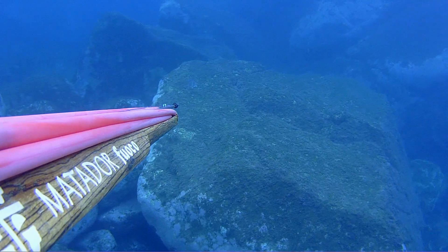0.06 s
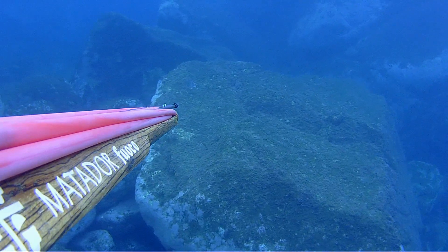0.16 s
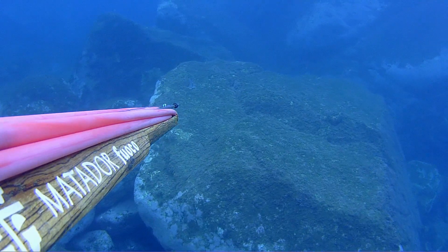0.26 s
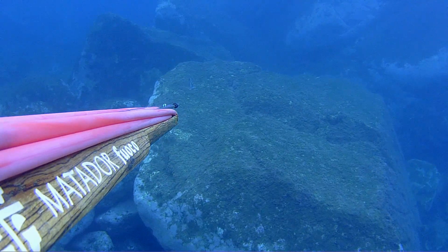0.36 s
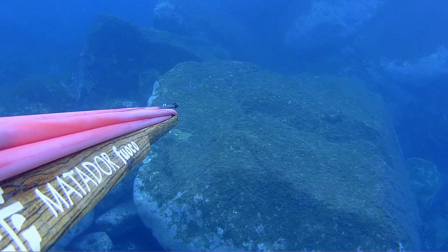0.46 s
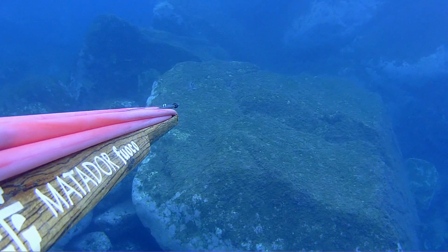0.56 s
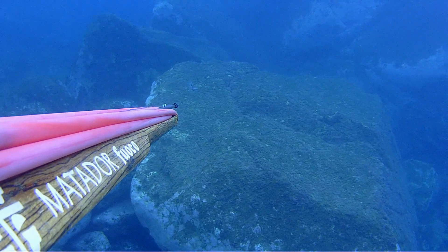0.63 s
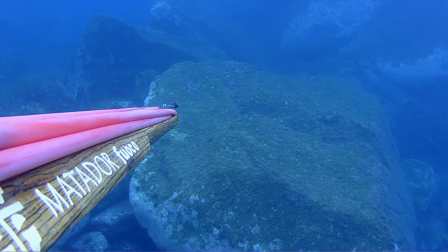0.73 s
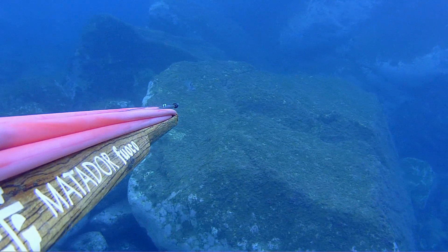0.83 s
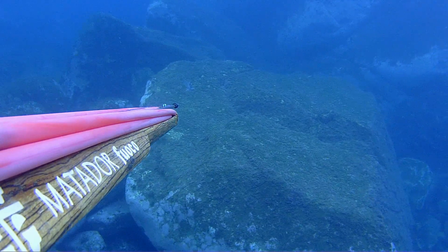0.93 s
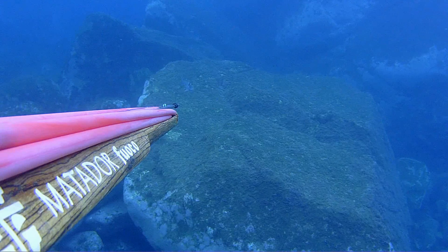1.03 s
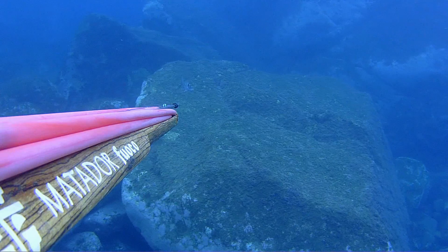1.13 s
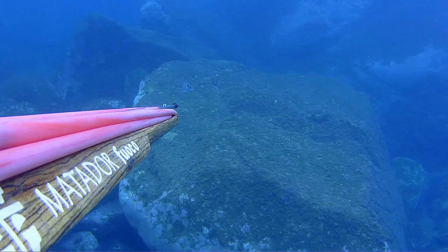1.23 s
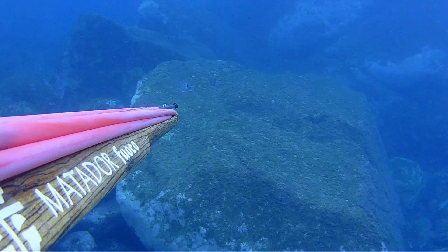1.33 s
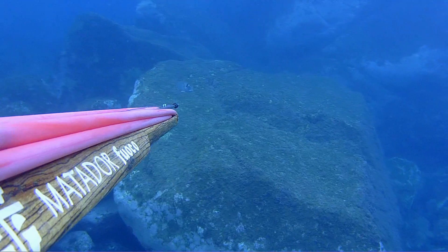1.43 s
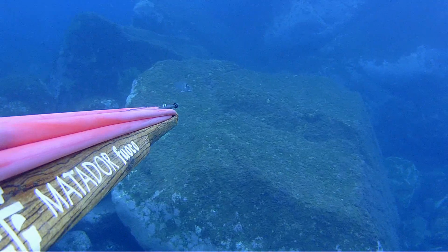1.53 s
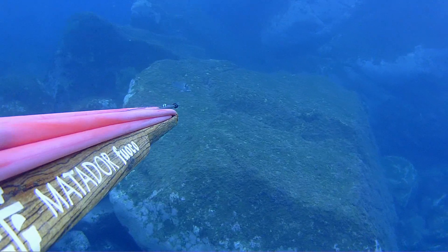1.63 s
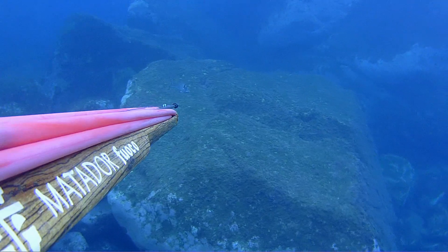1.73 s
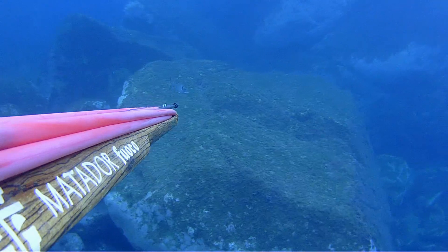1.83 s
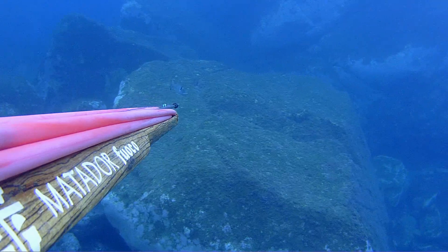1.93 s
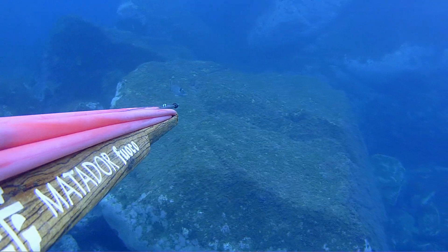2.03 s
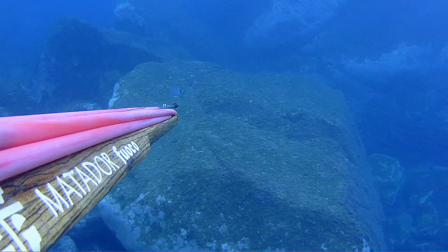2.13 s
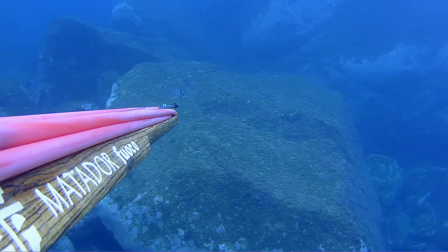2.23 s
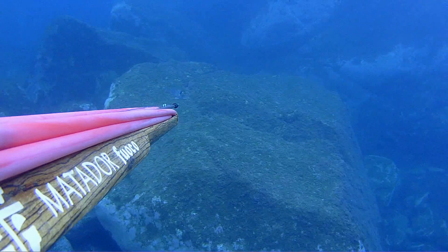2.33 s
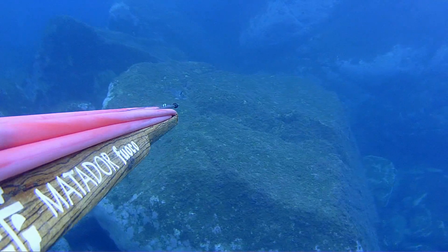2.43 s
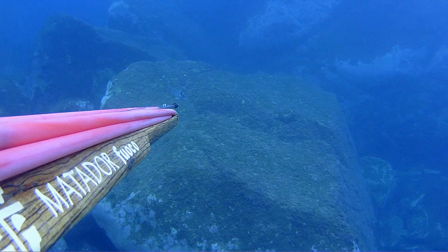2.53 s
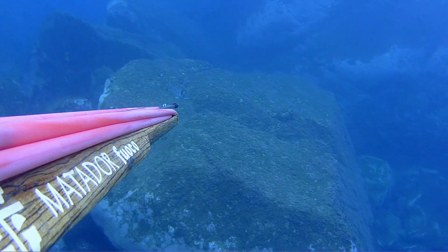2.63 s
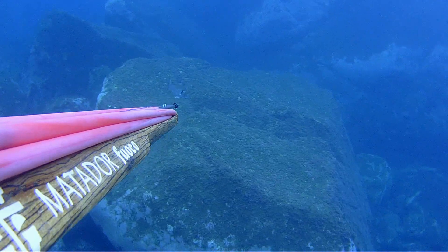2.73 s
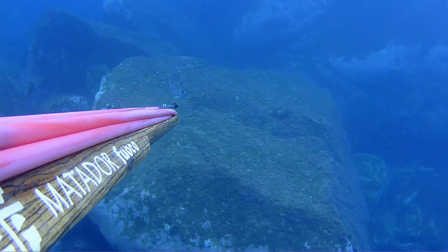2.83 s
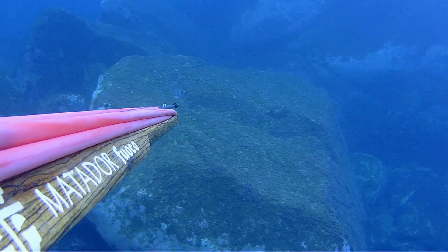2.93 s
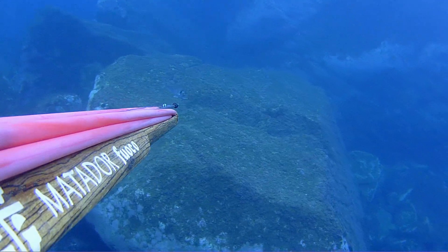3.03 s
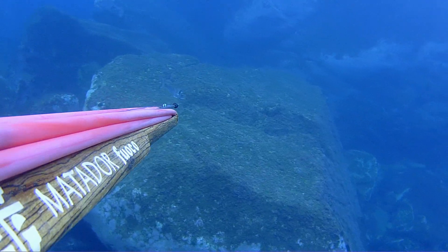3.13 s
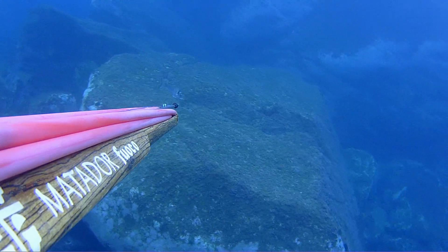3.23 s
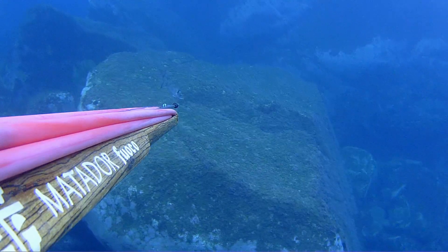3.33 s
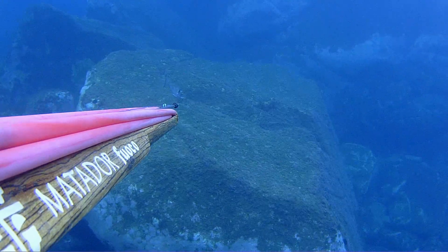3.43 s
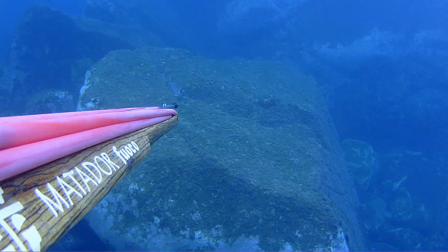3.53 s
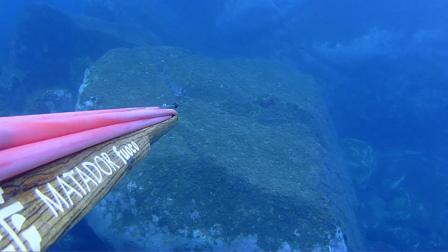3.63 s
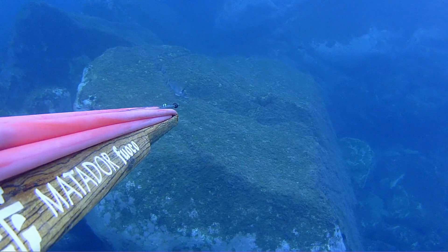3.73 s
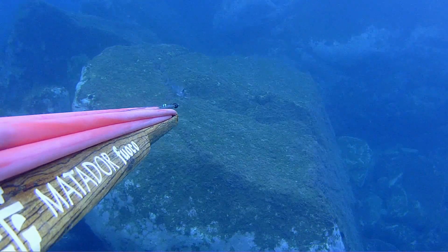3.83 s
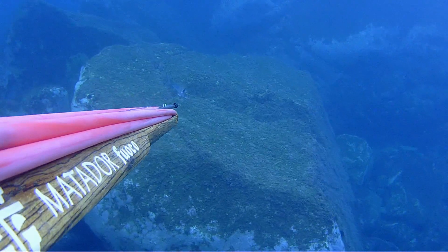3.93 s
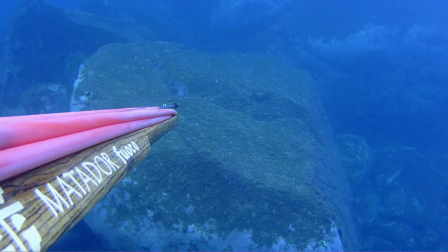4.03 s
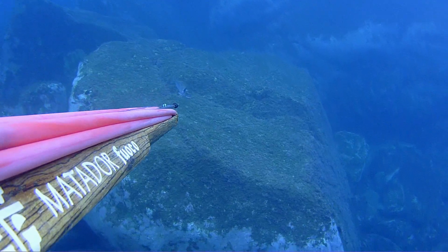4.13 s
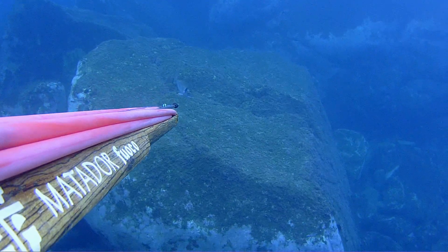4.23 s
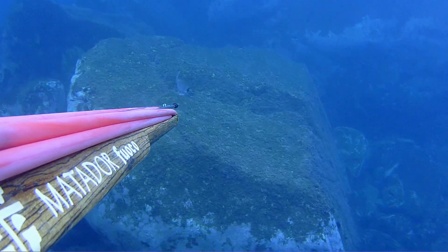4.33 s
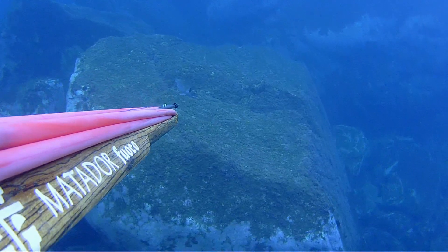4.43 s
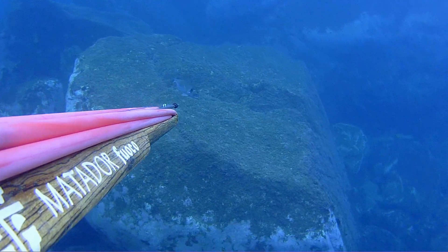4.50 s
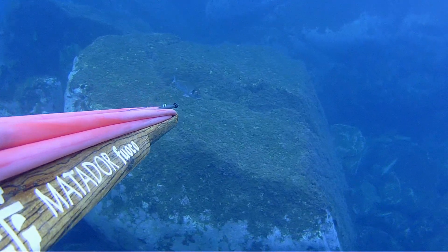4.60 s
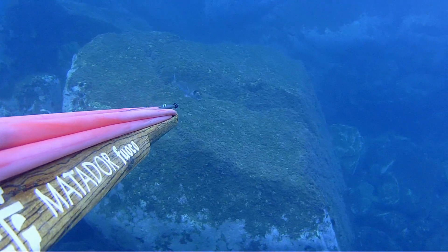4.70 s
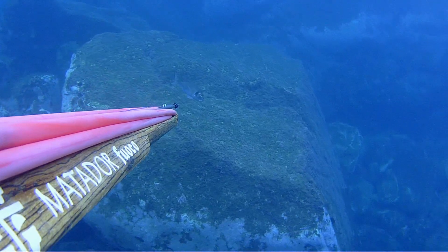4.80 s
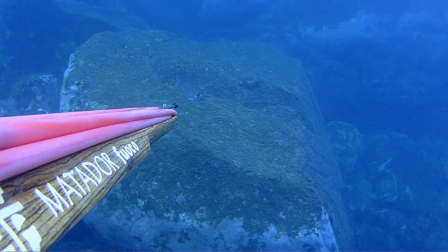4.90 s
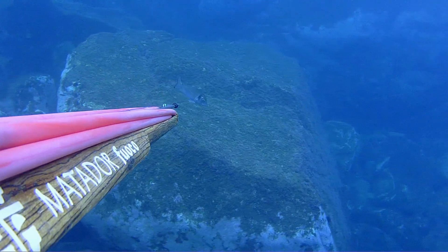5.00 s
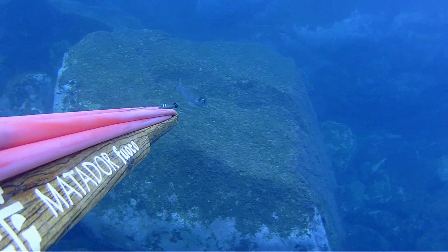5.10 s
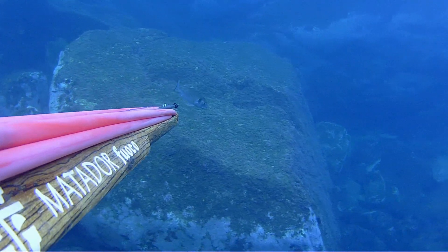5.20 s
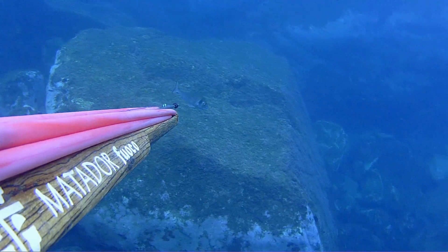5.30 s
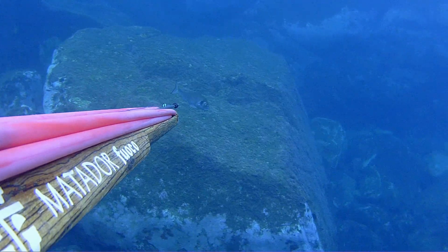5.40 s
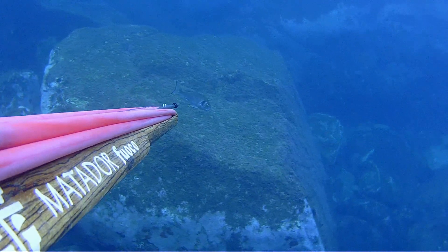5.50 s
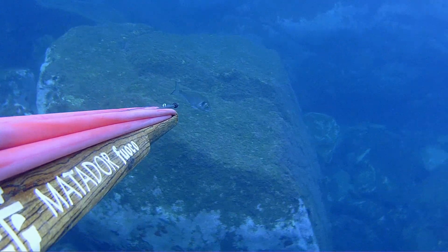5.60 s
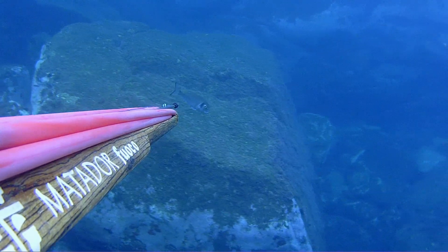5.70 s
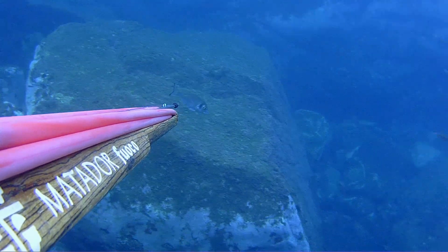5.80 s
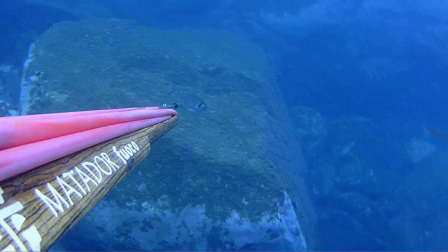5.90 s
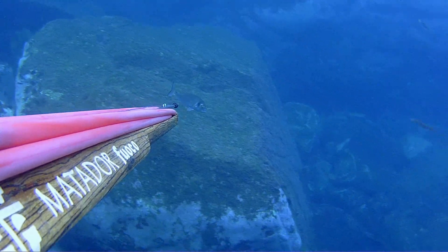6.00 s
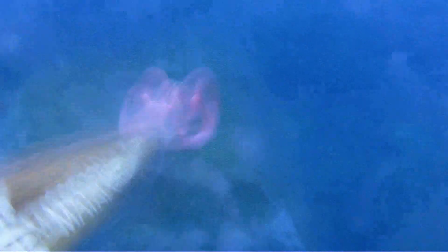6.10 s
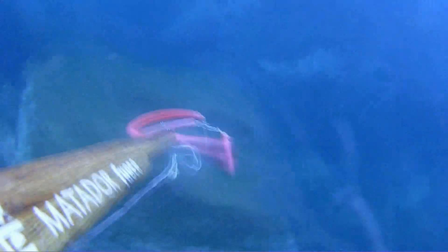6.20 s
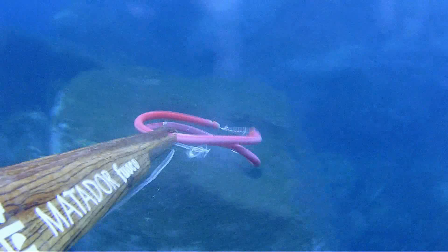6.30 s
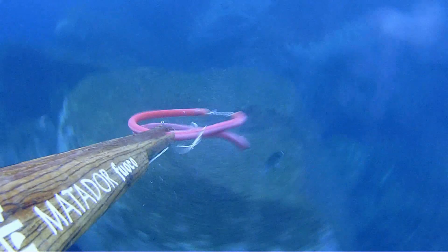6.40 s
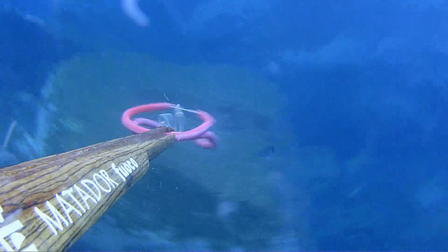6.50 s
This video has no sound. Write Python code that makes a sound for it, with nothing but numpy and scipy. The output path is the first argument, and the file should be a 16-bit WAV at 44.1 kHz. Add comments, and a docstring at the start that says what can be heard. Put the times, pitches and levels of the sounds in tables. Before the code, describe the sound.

Inside a sealed underwater housing on a band-powered speargun, a low hiss continues with sparse dry snaps and a faint low shudder from the hands, which grows. At about six seconds the gun fires: a huge distorting thump and clattering rattle of the wooden stock, quickly damped, then a short gritty ring of steel on rock and a few hard, woody knocks.

```python
"""Hiss, distant snaps and the low shudder of the hands come first, heard under water from a sealed
camera housing on a band-powered speargun. The trigger lets go: swings and slow modes jolt the
microphone into overload while filtered noise rattles the wooden stock. A steel shaft rings on
rock as wavering sines over grit, and loose parts knock on the stock with short dying modes."""
import sys
import numpy as np
from scipy import signal
from scipy.fft import rfft, irfft
from scipy.io import wavfile
from scipy.ndimage import uniform_filter1d

SR = 44100
rng = np.random.default_rng(int(sys.argv[2]) if len(sys.argv) > 2 else 0)


def transcribe(signal):
    """Save signal, clipped to [-1, 1], as a 16-bit WAV file at the path in sys.argv[1]."""
    frames = np.atleast_2d(signal).T
    limited = np.clip(frames, -1, 1)
    pcm = np.round(limited * 32767).astype(np.int16)
    wavfile.write(sys.argv[1], SR, pcm)


N = 288855

# Colour of the microphone and water hiss: pitch_hz, level_db (per Hz, relative)
HISS_COLOUR = [(29, -26), (50, -13), (60, -1.5), (380, -4), (440, -6), (690, -9), (2750, -21.5),
               (12000, -26), (12800, -26), (13000, -70)]
HISS_DB = -55

# Unsteady hands on the grip, tightening toward the shot: start_s, level_db
GRIP_LEVELS = [(0.0, -65), (0.75, -63.5), (1.45, -61), (2.0, -60.5), (2.65, -59.5), (3.05, -55),
               (3.4, -52.5), (3.54, -59), (3.62, -48.5), (3.97, -52.5), (4.08, -64), (4.3, -55),
               (4.45, -59.5), (5.05, -54.5), (5.28, -52), (5.55, -47), (5.76, -48.5), (5.99, -42)]
# Colour of the shudder, then the cut that keeps it low: pitch_hz, level_db
SHUDDER_COLOUR = [(4, 4), (12, 12.5), (35, 11), (50, -2.5), (62, -44)]
SHUDDER_CUT = [(60, 0), (80, -40)]
TREMOR_DB = 1.8  # the shudder comes and goes a few times a second
# The gun settles in the water, rocking while the stock hums:
# start_s, rock_level_db, rock_pitch_hz, hum_level_db, hum_pitch_hz
SETTLING = [(6.19, -26, 28.6, -34, 94.4), (6.208, -39, 28.8, -41, 92), (6.244, -22.5, 28.5, -38, 96),
            (6.29, -27.5, 28.3, -45, 95), (6.332, -36, 28.1, -47, 93.5), (6.416, -38, 28.3, -39, 95.8),
            (6.448, -37.5, 28.3, -52.5, 95), (6.476, -37, 29.1, -41, 104), (6.508, -44, 28.8, -42, 106),
            (6.55, -48, 30.6, -42, 119)]
# Colour of the water slopping round the gun: pitch_hz, level_db
SLOP_COLOUR = [(5, -20), (13, 5.5), (45, -4), (70, -16), (160, -16.5), (260, -40), (500, -110)]

# The nearer snaps: start_s, level_db (before shares and shell), brightness_db_per_octave,
# high_shell_extra_db
NEAR_SNAPS = [(0.028, -44.5, -1.5, -2), (0.195, -55.5, -2, 2), (0.614, -54, 0, 5), (0.6355, -50.5, 1, 6),
              (0.6494, -54, 0, 1), (0.9353, -58, 10, 1), (0.9472, -55, 8, 9), (1.055, -51, -7.5, 7),
              (1.2306, -55.5, 2, 9), (1.2464, -54, 0, 0), (1.6506, -56, 0, 10.5), (1.7419, -52.5, 0, 10.5),
              (2.0103, -54, 3, 5), (2.0264, -53, 3, -6), (2.0394, -59.5, -9, 0), (2.0642, -56, -1, 2),
              (2.5691, -57, 11, 0), (2.596, -44, 0, -3), (2.6844, -58, 0, 8), (2.7811, -56.5, -7, 8),
              (2.827, -59, 1, 6), (2.9382, -52, -3, -2), (2.9741, -47, -2, 3), (3.482, -55.5, 10, 6),
              (3.6391, -56, -2, -2), (3.697, -53, 0, -3), (3.894, -52.5, 5, 4), (4.0238, -56, 0, 1),
              (4.3864, -53.5, 11, 2), (4.3989, -36.5, -2.5, -5), (4.5151, -36.5, 1, -3.5),
              (4.7436, -51, 5.5, -5), (5.1392, -57.5, 6.5, 2), (5.2205, -54.5, 9, 1),
              (5.7214, -44, -2.5, -9), (5.8646, -56.5, 8, 0)]
# Share of a plain snap in the deep, low, high and top shell modes: centre_hz, level_db
SNAP_SHARES_BY_BAND = [(1600, -10.5), (3900, 0), (6700, -7), (10500, -4.5)]
# Resonances of the housing shell, deep to top: pitch_hz, width_hz, level_db (relative)
SHELL_DEEP_MODES = [(1220, 430, -3), (1530, 270, -2), (2270, 380, 3)]
SHELL_LOW_MODES = [(2856, 220, 1), (3490, 410, -1), (4380, 410, 2), (4820, 460, -1.5)]
SHELL_HIGH_MODES = [(6250, 680, -1), (7240, 560, 0)]
SHELL_TOP_MODES = [(8900, 1200, -3.5), (10700, 860, -1), (12000, 1200, -10)]
# Upper limit of the snaps: pitch_hz, level_db
SNAP_TOP_LIMIT = [(12600, 0), (13000, -8), (13300, -50)]
FAR_SNAPS_PER_S, FAR_SNAP_DB = 14, -66
FAR_DULLEST, FAR_BRIGHTEST = -2.5, 8  # dB per octave
FAR_HIGH_DB = 7  # at most this much extra in the high shell modes

# Knocks on the stock: start_s, level_db (peak of the low modes), treble_db (relative to them)
STOCK_KNOCKS = [(6.3496, -14.5, -10), (6.4966, -9.5, -9), (6.521, -9, -20), (6.5465, -11, 0.5)]
# Short modes of the wood, low and high: pitch_hz, level_db (relative), t60_s
KNOCK_LOW_MODES = [(700, -18, .02), (1150, -10, .011), (1500, 0, .015), (1870, -2, .012), (2200, -12, .01)]
KNOCK_HIGH_MODES = [(2700, -3, .012), (3270, -3, .012), (4650, -11, .028), (5000, -4, .01),
                    (5600, -4, .012), (6490, -9, .01)]
# Dull contact of the wood, colouring the low modes' drive: pitch_hz, level_db
WOOD_CONTACT = [(350, -30), (950, -8), (1400, 0), (2100, -2.5), (3600, -29), (12000, -50)]

# Steel modes of the shaft: pitch_hz, level_db (over the grit), t60_s (before the overall fade)
SHAFT_MODES = [(3284, -8, .3), (4040, -8, .3), (4091, -1, .5), (6142, -8, .9), (8193, -13, 9.),
               (9458, -10, .3), (10540, -13, .4), (12280, -13, 2.)]
# Colour of the grit: pitch_hz, level_db (per Hz, relative)
GRIT_COLOUR = [(600, -45), (1000, -14), (3700, -6.5), (5050, -10), (9400, -14.5), (13400, -16),
               (14000, -70)]
GRIT_FADE_T60 = 0.61  # seconds, before the overall fade
# The strike swells as the echoes arrive, holds, then dies
STRIKE_S, STRIKE_DB, STRIKE_FROM_DB = 6.343, -32.5, -19
STRIKE_RISE_S, STRIKE_HOLD_S, STRIKE_T60 = 0.016, 0.021, 0.18

# Bumps that set the stock rattling: start_s, level_db (before the stock), t60_s,
# bass_share_db, treble_share_db
BUMPS = [(6.0128, -36, .03, 0, -6), (6.0155, 3, .006, 5, -7), (6.0176, 0, .01, 2.5, 4.5),
         (6.0226, -2.5, 0.021, -5, -2), (6.0307, .5, 0.0085, 2.5, 1), (6.0418, -41.5, 0.038, 6.5, -11),
         (6.0532, -25, .03, 1, -8), (6.0559, 4, 0.04, -7.5, -4), (6.0646, -6, .077, 3.5, -9),
         (6.0753, -6.5, .029, 5.5, 0), (6.081, -10.5, 0.036, 8, -7), (6.0921, -1.5, 0.041, 3.5, -1.5),
         (6.0965, -10.5, .042, 7, 0), (6.1068, -9, 0.046, 12, -8), (6.110, -9.5, 0.098, 3.5, -5),
         (6.122, -15, .053, 1.5, -5.5), (6.1343, -18, .023, 8, -9), (6.152, -23, .15, -2.5, -1.5),
         (6.178, -15, .032, -17, 3.5), (6.181, -13, 0.022, 3.5, -21), (6.195, -28, .047, -4, -11),
         (6.217, -28.5, .049, -13, 0), (6.2225, -30.5, .01, -8, 6), (6.3076, -37.5, 0.063, 1, -10),
         (6.476, -55.5, 0.33, 15.5, -20), (6.503, -37, .056, -1, -7)]
TREBLE_FADE = 0.73  # the treble of a bump dies in this share of its t60
# Slack bands and line drag along the stock: start_s, level_db (before the stock)
DRAG_LEVELS = [(6.205, -63), (6.215, -44), (6.245, -36.5), (6.30, -45), (6.335, -42.5), (6.37, -41.5),
               (6.42, -60), (6.48, -58), (6.52, -49), (6.536, -36), (6.55, -41)]
DRAG_BASS_DB, DRAG_TREBLE_DB = -5.5, -12.5
# Resonances of the stock, bass, middle and treble: pitch_hz, width_hz, level_db (relative)
STOCK_BASS_MODES = [(205, 163, 0.5), (280, 205, 0), (390, 232, -1.5), (569, 300, -1.5)]
STOCK_MIDDLE_MODES = [(944, 480, -2.5), (1570, 380, 2.5), (2020, 840, -7)]
STOCK_TREBLE_MODES = [(3480, 1520, 3), (6600, 750, -2.5), (9600, 1600, -2.5), (13100, 1400, -18)]

# The released gun swings and is caught by the hand: start_s, level_db (before overload), pitch_hz
RELEASE_SWING = (6.0165, 5.8, 52.1)
SWING_CYCLES, CATCH_S = 1.25, .00055
# Recoil knocks the gun back and forth: start_s, level_db (before the push), push (signed factor)
RECOIL_KNOCKS = [(6.056, 5.5, -0.48), (6.072, -2, 0.74), (6.083, -3, -0.99), (6.0921, 4, 0.79),
                 (6.110, -5, -0.75), (6.1412, -10, 0.56), (6.164, -12, 0.28), (6.217, -24, -0.54)]
# Slow modes of the gun: pitch_hz, level_db (relative), t60_s
SWAY_MODES = [(33.2, -1.5, 0.27), (44.9, -8.5, 0.17), (97.5, -4.5, 0.24), (147.5, -8, 0.157),
              (188.3, -4.5, 0.11), (233.4, -6.5, 0.14), (276.7, -9, 0.146), (388.5, -9, 0.092),
              (508, -14, 0.086), (589, -14, 0.13)]

# A faint difference between the two channels, mostly treble: pitch_hz, level_db
CHANNEL_DIFFERENCE = [(500, -77), (1500, -59), (2500, -44), (6000, -27), (9000, -30), (13000, -44)]
FULL_SCALE = 0.46
EDGE_HZ = 15400  # top of the passed band


def gain_of(db):
    """Turns decibels into an amplitude factor."""
    return 10 ** (np.asarray(db) / 20)


def evened(x):
    """Brings a sound to unit RMS."""
    return x / np.sqrt(np.mean(x ** 2) + 1e-20)


def wander(noise, *widths):
    """Smooths noise over these spans of samples into a slow drift of unit RMS."""
    for width in widths:
        noise = uniform_filter1d(noise, size=width)
    return evened(noise)


def add(mix, start_s, sound):
    """Drops a sound into the mix, cut at the end."""
    part = mix[round(start_s * SR):][:len(sound)]
    part += sound[:len(part)]


def shaped(x, points):
    """Colours a sound by a spectrum of pitch_hz, level_db points."""
    f, db = np.transpose(points)
    hz = np.fft.rfftfreq(len(x), 1 / SR)
    curve_db = np.interp(np.log(hz + 1), np.log(f + 1), db)
    return irfft(rfft(x) * gain_of(curve_db), len(x))


def ring(modes, t):
    """Dying sines struck at t = 0."""
    return sum(gain_of(db - 60 * t / t60) * np.sin(2 * np.pi * hz * t) for hz, db, t60 in modes)


def body(resonances):
    """Unit-energy impulse response of steep-flanked resonances that swell before they die."""
    t, response = np.arange(1500) / SR, 0
    for k, (hz, width, db) in enumerate(resonances):
        swell = 2 * np.pi * width * t * np.exp(-2 * np.pi * width * t)
        tone = np.sin(2 * np.pi * hz * t)
        # neighbours take opposite signs
        response = response + (-1) ** k * gain_of(db) * np.sqrt(width) * swell * tone
    return response / np.linalg.norm(response)


def through(drives, bodies):
    """Each drive rings its own set of resonances."""
    return sum(signal.oaconvolve(x, body(b))[:N] for x, b in zip(drives, bodies))


def along(rows, sound, column):
    """Rides a sound along a level curve: -120 dB before it, the last level held after it."""
    rows = np.transpose(rows)
    level_db = np.interp(np.arange(N) / SR, rows[0], rows[column], -120, rows[column][-1])
    return evened(sound) * gain_of(level_db)


def hiss():
    """Steady microphone and water hiss, made of coloured noise."""
    return gain_of(HISS_DB) * evened(shaped(rng.standard_normal(N), HISS_COLOUR))


def snaps(crack_s=.0015, echo_db=-11, echo_t60=0.17, spread_db=7.0):
    """A crack and scattered echoes off the rocks ring the shell; bright snaps favour upper modes."""
    t = np.arange(6000) / SR
    shape = np.exp(-t / crack_s) + gain_of(echo_db - 60 * t / echo_t60)
    # far snaps fall at random: start, level, brightness, high extra
    lowest = [0, FAR_SNAP_DB - spread_db, FAR_DULLEST, 0]
    span = [N / SR, 2 * spread_db, FAR_BRIGHTEST - FAR_DULLEST, FAR_HIGH_DB]
    far = rng.random((round(FAR_SNAPS_PER_S * N / SR), 4)) * span + lowest
    hz, plain_db = np.transpose(SNAP_SHARES_BY_BAND)
    octaves = np.log2(hz / hz.mean())
    is_high = np.arange(4) == 2
    drives = np.zeros((4, N))
    for start_s, db, bright_db, high_db in list(NEAR_SNAPS) + list(far):
        burst = gain_of(db) * shape * rng.standard_normal(len(t))
        shares_db = plain_db + bright_db * octaves + high_db * is_high
        for drive, share_db in zip(drives, shares_db):
            add(drive, start_s, gain_of(share_db) * burst)
    shell = (SHELL_DEEP_MODES, SHELL_LOW_MODES, SHELL_HIGH_MODES, SHELL_TOP_MODES)
    return shaped(through(drives, shell), SNAP_TOP_LIMIT)


def shudder():
    """Low noise of the held gun, its swings partly evened out, fading as the shot goes off."""
    low = shaped(rng.standard_normal(N), SHUDDER_COLOUR)
    low = low / uniform_filter1d(low ** 2, size=5000) ** 0.22  # steadier than plain noise
    low = low * gain_of(TREMOR_DB * wander(rng.standard_normal(N), 4000, 2500))
    low = shaped(low, SHUDDER_CUT)
    fade = np.clip((GRIP_LEVELS[-1][0] + 0.055 - np.arange(N) / SR) / 0.065, 0, 1)
    return along(GRIP_LEVELS, low, column=1) * fade


def settling():
    """The gun rocks as a gliding low sine with water slopping round it; the stock hums unevenly."""
    t = np.arange(N) / SR
    start_s, _, rock_hz, _, hum_hz = np.transpose(SETTLING)
    rock, hum = (np.sin(2 * np.pi * np.cumsum(np.interp(t, start_s, hz)) / SR)
                 for hz in (rock_hz, hum_hz))
    hum = hum * gain_of(4.1 * wander(rng.standard_normal(N), 700, 400))  # it breaks up
    slop = evened(shaped(rng.standard_normal(N), SLOP_COLOUR))
    rock = rock + gain_of(0.1) * slop
    return along(SETTLING, rock, column=1) + along(SETTLING, hum, column=3)


def knocks(contact_s=0.0057):
    """Each knock is a few milliseconds of contact chatter into the short modes of the wood."""
    out, t = np.zeros(N), np.arange(2500) / SR
    swell = np.clip(1 - (2 * t / contact_s - 1) ** 2, 0, 1)
    for start_s, db, treble_db in STOCK_KNOCKS:
        noise = rng.standard_normal(len(t))
        dull = shaped(noise, WOOD_CONTACT) * swell
        low = signal.oaconvolve(dull, ring(KNOCK_LOW_MODES, t))[:len(t)]
        high = signal.oaconvolve(noise * swell ** 2, ring(KNOCK_HIGH_MODES, t))[:len(t)]
        treble = gain_of(treble_db) * high / abs(high).max()
        add(out, start_s, gain_of(db) * (low / abs(low).max() + treble))
    return out


def strike(waver_db=4.5):
    """Shaft on rock: steel modes, each wavering with the echoes, over grit with its own fade."""
    out, t = np.zeros(N), np.arange(9000) / SR
    noise, lumps, *slow = rng.standard_normal((2 + len(SHAFT_MODES), len(t)))
    grit_db = 2.3 * wander(lumps, 80) - 60 * t / GRIT_FADE_T60
    grit = evened(shaped(noise, GRIT_COLOUR)) * gain_of(grit_db)
    wavers = gain_of(waver_db * wander(slow, 120, 60) - 1.5)
    steel = sum(ring([mode], t) * waver for mode, waver in zip(SHAFT_MODES, wavers))
    rise_db = STRIKE_FROM_DB * np.clip(1 - t / STRIKE_RISE_S, 0, 1)
    fall_db = -60 * np.maximum(t - STRIKE_RISE_S - STRIKE_HOLD_S, 0) / STRIKE_T60
    add(out, STRIKE_S, (steel + grit) * gain_of(STRIKE_DB + rise_db + fall_db))
    return out


def rattles(grain_db=4.0, drag_grain_db=4.0):
    """Uneven grains of chatter ring the stock: dying after each bump, drawn out as the slack drags."""
    t, drives = np.arange(9000) / SR, np.zeros((3, N))
    for start_s, db, t60, bass_db, treble_db in BUMPS:
        *noises, lumps = rng.standard_normal((4, len(t)))
        size = gain_of(db + grain_db * wander(lumps, 60))
        shares = zip(drives, noises, (bass_db, 0, treble_db), (1, 1, TREBLE_FADE))
        for drive, noise, share_db, fade in shares:
            add(drive, start_s, size * noise * gain_of(share_db - 60 * t / (fade * t60)))
    *noises, lumps = rng.standard_normal((4, N))
    size = along(DRAG_LEVELS, gain_of(drag_grain_db * wander(lumps, 120)), column=1)
    drives = drives + size * noises * gain_of([[DRAG_BASS_DB], [0], [DRAG_TREBLE_DB]])
    return through(drives, (STOCK_BASS_MODES, STOCK_MIDDLE_MODES, STOCK_TREBLE_MODES))


def jolts():
    """The release swings the gun until the hand stops it; each recoil knock rings its slow modes."""
    out, t = np.zeros(N), np.arange(SR // 2) / SR
    start_s, db, hz = RELEASE_SWING
    length = SWING_CYCLES / hz
    swing = np.cos(2 * np.pi * hz * np.minimum(t, length))
    catch = 1 + np.exp((t - length) / CATCH_S)
    add(out, start_s, gain_of(db) * swing / catch)
    for start_s, db, push in RECOIL_KNOCKS:
        add(out, start_s, push * gain_of(db) * ring(SWAY_MODES, t))
    return out


def scene():
    """All layers together, the same sound on both channels."""
    background = hiss() + snaps() + shudder() + settling()
    mid = background + knocks() + strike() + rattles() + jolts()
    return np.array([mid, mid])


def record(dry, knee_db=-22, share=0.22, recover_db=58.0, bleed=0.088):
    """Gain sinks late after loud jolts and recovers, overload flattens peaks, then the band limit."""
    power_db = 10 * np.log10(abs(uniform_filter1d(dry[0] ** 2, size=200)) + 1e-12)
    fall = np.arange(N) * recover_db / SR  # recover_db is per second
    held_db = np.maximum.accumulate(power_db + fall) - fall
    over_db = np.clip(held_db - knee_db, 0, 20)
    late_db = uniform_filter1d(over_db, size=801, origin=400)  # averages the recent past
    x = dry[0] / gain_of(share * late_db)
    flat = FULL_SCALE * np.tanh((abs(x) / FULL_SCALE) ** 3.014) ** (1 / 3) * np.sign(x)
    excess = x - flat
    ripple = np.tanh(excess - uniform_filter1d(excess, size=24))
    flat = flat + bleed * ripple  # treble ripples on the flat tops
    side = np.roll(shaped(flat, CHANNEL_DIFFERENCE), 40)  # the two channels differ faintly in the treble
    edge = signal.firwin(511, EDGE_HZ, window=("kaiser", 9), fs=SR)
    return signal.oaconvolve([flat + side, flat - side], edge[None], "same")


dry = scene()
out = record(dry)
transcribe(out)
```